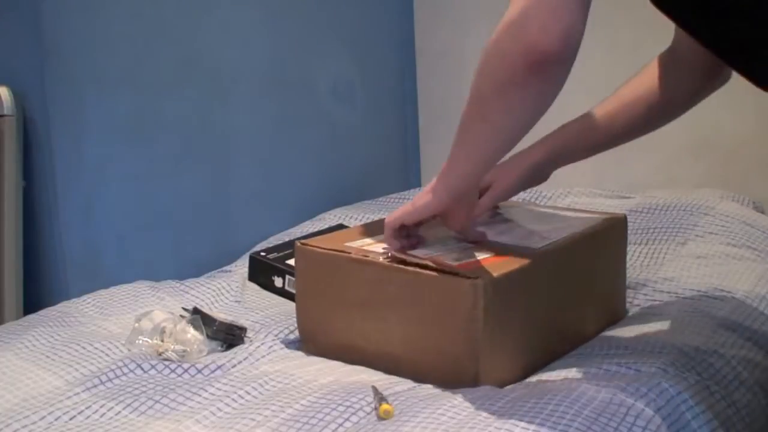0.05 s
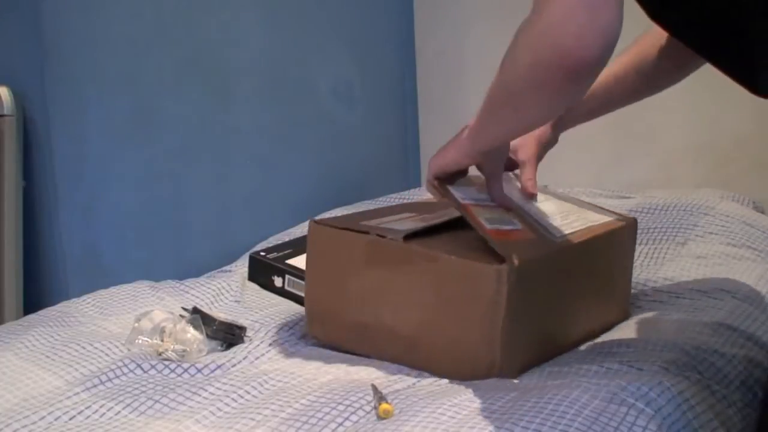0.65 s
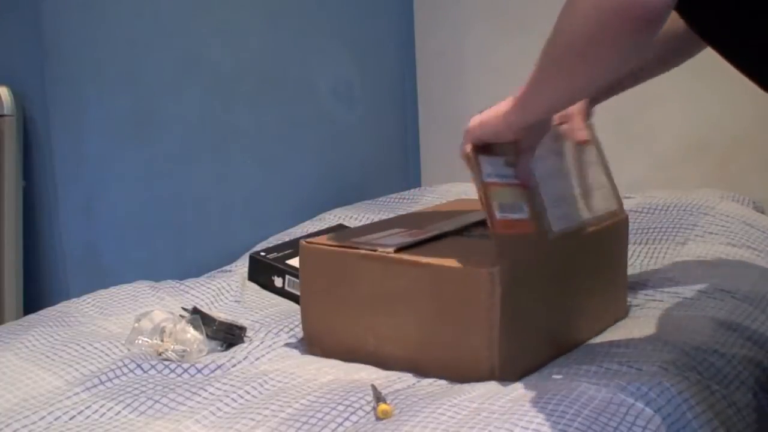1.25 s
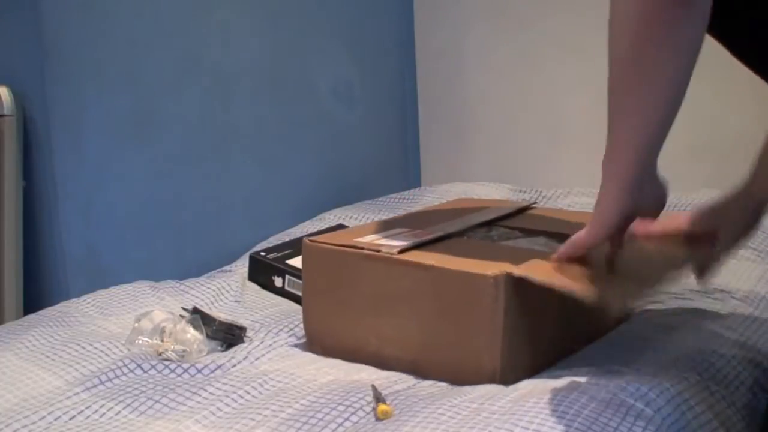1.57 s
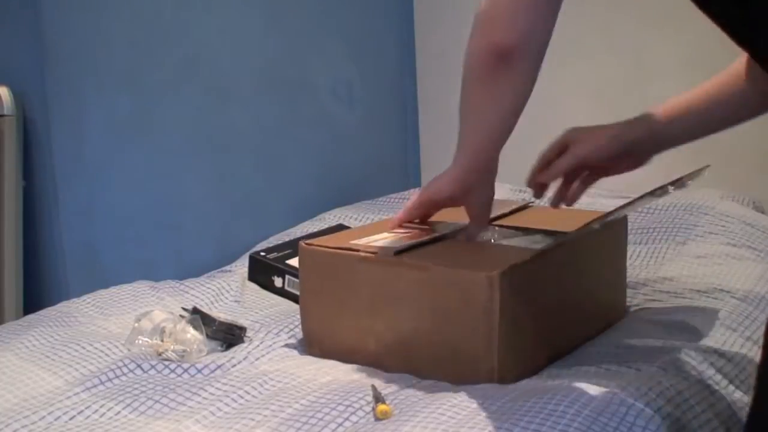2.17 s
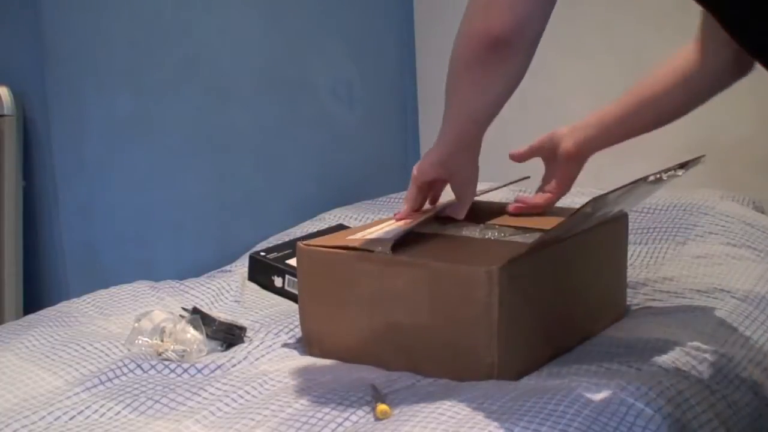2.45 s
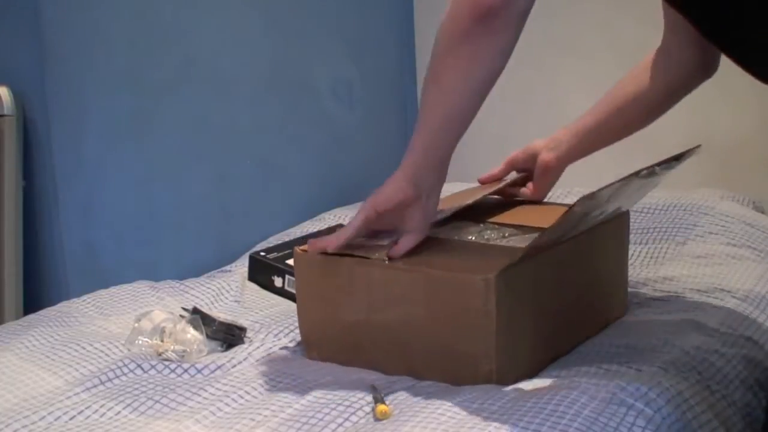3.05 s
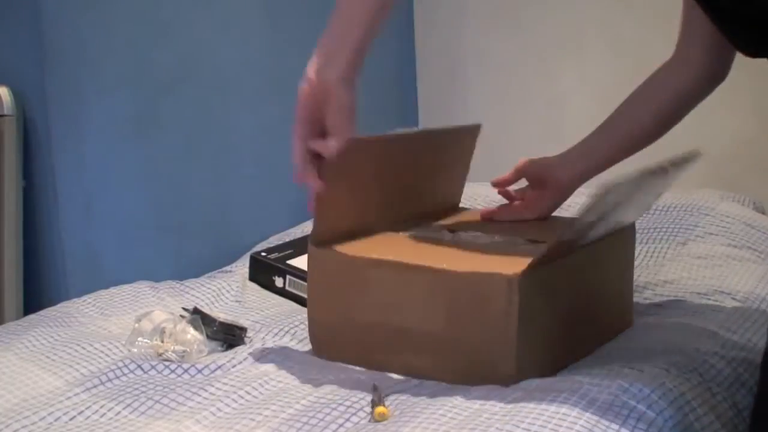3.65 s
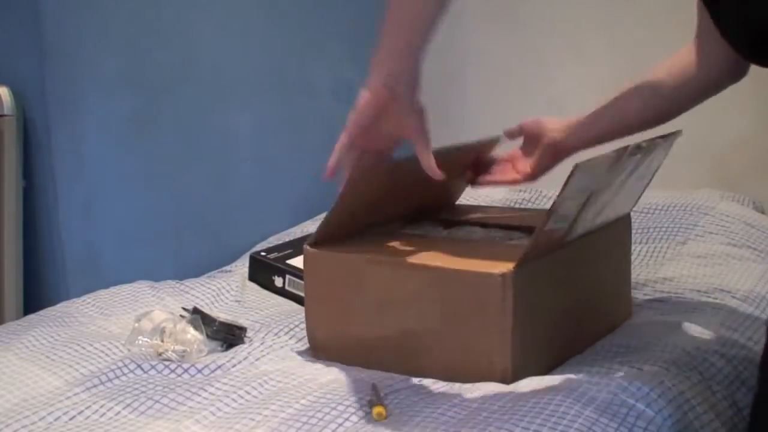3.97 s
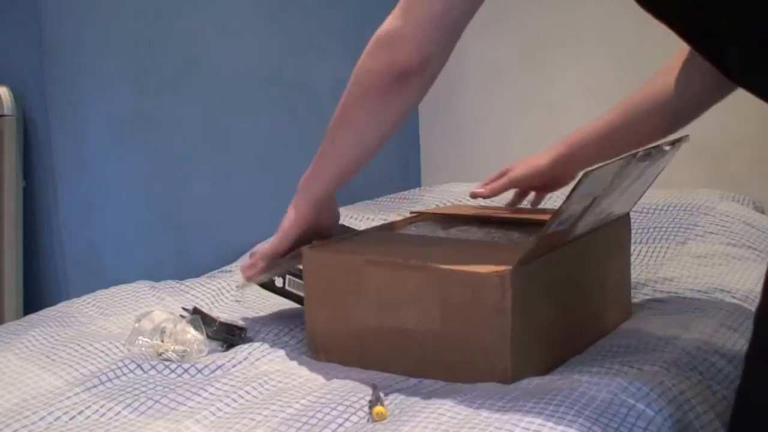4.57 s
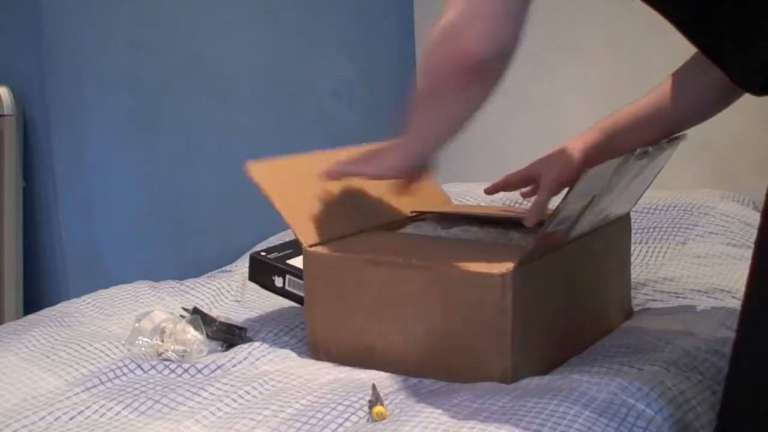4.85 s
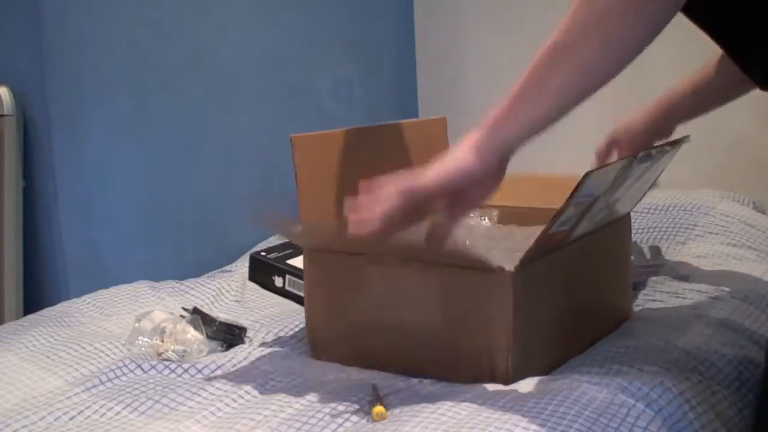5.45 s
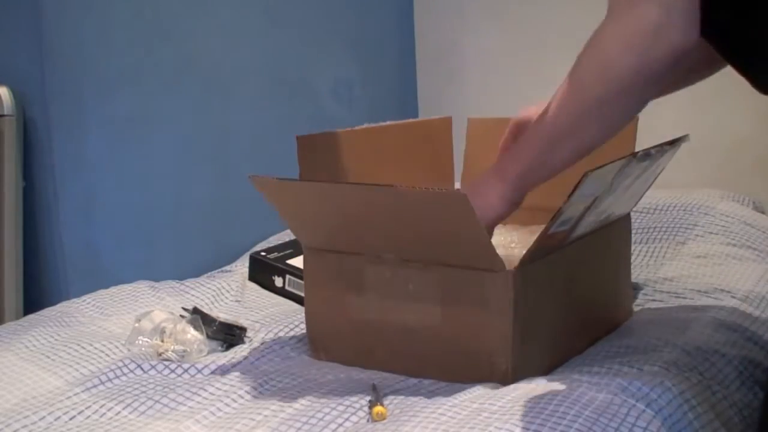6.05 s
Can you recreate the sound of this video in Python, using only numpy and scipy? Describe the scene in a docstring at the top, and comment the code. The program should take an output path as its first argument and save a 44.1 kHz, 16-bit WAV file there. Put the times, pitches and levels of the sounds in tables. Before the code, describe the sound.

Dry cardboard scraping and sharp tape snaps lead to a brief rip and a loud hollow thump as a box flap comes free. Fingers rub and tap the panels until a second rip sets off several quick knocks. The flaps then slide and creak quietly, and one last scrape grows louder. The sound is close, in a small room with short echoes and a faint hiss.

```python
"""A cardboard shipping box being opened on a bed, close to the microphone in a small bedroom.
The last of the packing tape snaps and rips, and the freed flaps thump the hollow box, ringing its panels.
Hands and flaps slide over the board as they are folded back; fingers tap and edges creak.
Near walls give short echoes, over a low room murmur and faint microphone hiss."""
import sys
import numpy as np
from scipy import signal
from scipy.fft import rfft
from scipy.io import wavfile
from scipy.ndimage import uniform_filter1d

SR = 44100
rng = np.random.default_rng(int(sys.argv[2]) if len(sys.argv) > 2 else 0)


def inscribe(sig):
    """Save sig as 16-bit PCM at rate SR to the path in sys.argv[1].

    A 1-D sig is mono; a 2-D sig holds one channel per row.
    Samples are clipped to [-1, 1] before scaling.
    """
    pcm = np.round(np.clip(np.atleast_2d(sig).T, -1, 1) * 32767)
    wavfile.write(sys.argv[1], SR, pcm.astype(np.int16))


N = 277869
TIME = np.arange(N) / SR

# room murmur and microphone hiss: (frequency [Hz], level [dB])
ROOM_TONE_SPECTRUM = [(25, -37.5), (130, -6), (175, -6), (236, -25), (317, -7), (394, -16), (840, -16.5),
                      (1330, -20), (2840, -26.5), (12900, -33), (14000, -50)]
# echoes off the near walls and ceiling: (delay [s], gain [ratio])
WALL_ECHOES = [(.0013, 0.18), (.0072, 0.097), (.0098, 0.34), (0.011, 0.2)]
# reverberation of the bedroom: (frequency [Hz], time to fall 60 dB [s])
BEDROOM_T60 = [(100, 0.35), (300, 0.28), (1000, 0.28), (4000, 0.35), (8000, 0.33), (14000, 0.39)]
# stereo width of the reverberation: (frequency [Hz], side gain [dB])
REVERB_WIDTH = [(100, -39), (400, -16.5), (1000, -8.5), (2500, -9), (5000, -13.5), (9500, -7.5),
                (12000, -8), (15000, -80)]
# colours of the finest, fine and coarser slips on board, and of tape: (frequency [Hz], level [dB])
SIZZLE_SPECTRUM = [(1000, -40), (5000, -8.5), (10500, -0.5), (12500, -5.5), (14000, -15)]
HISS_SPECTRUM = [(100, -25), (700, 1.5), (2000, 4), (5500, 4.5), (8000, 5), (11000, -5), (12800, -8),
                 (14200, -20), (16000, -62)]
RASP_SPECTRUM = [(60, -83), (200, -4.5), (400, 5), (1000, 5), (1400, -1.5), (2000, -1.5), (3000, -9),
                 (5000, -12.5), (12000, -26.5)]
TAPE_SPECTRUM = [(100, -32), (600, 4), (2000, 6), (7000, 6.5), (11500, 4.5), (13000, -0.5), (14200, -19)]
# resonances of the hollow box and its panels: (frequency [Hz], level [dB])
BOX_MODES = [(88.7, 4), (162, -4.5), (192, -1), (250, 2), (299, 3), (332, 1.5), (381, 5.5), (402, -2.5),
             (433, -3.5), (483, 3), (549, 4.5), (660, 5.5), (748, 3), (942, 1), (1025, -2), (1285, -12)]
# the small box radiates little deep bass: (frequency [Hz], gain [dB])
BOX_RADIATION = [(25, -55), (55, -2), (88, 2.5), (150, -2), (200, -0.5)]
# board edges stick and slip: (start [s], length [s], level [dB], pitch [Hz], sharpness [Q])
EDGE_CREAKS = [(1.82, 0.015, -36.5, 1840, 1.2), (2.481, 0.06, -42.5, 1930, 13),
               (2.847, 0.045, -40.5, 2230, 1.5), (4.199, 0.013, -45.5, 2090, 1.5),
               (5.514, 0.024, -48, 1150, 18), (5.568, 0.152, -42.5, 527, 2.5),
               (5.613, 0.09, -44.5, 1150, 1.4), (5.755, 0.024, -42, 620, 6.5)]
# a hand or flap slides over the board: (start [s], length [s], hiss [dB], sizzle [dB], rasp [dB],
# panel drumming [dB], swell from start to end [dB], attack [s])
SLIDING_STROKES = [(0, 0.17, -46.5, -78, -44, -43, -8, 0.00053),
                   (0.179, 0.19, -51, -47.5, -46, -38.5, -6, 0.0054),
                   (0.38, 0.22, -46.5, -56, -42, -45, -1, 0.02),
                   (0.591, 0.55, -61, -78, -50.5, -48, 3, 0.015),
                   (0.764, 0.09, -42.5, -45.5, -48.5, -66, 0, 0.061),
                   (1.185, 0.09, -43, -71, -44, -52, -19, 0.027),
                   (1.278, 0.41, -49.5, -49.5, -54, -51.5, -3.5, 0.034),
                   (1.648, 0.038, -39.5, -41.5, -47.5, -60, 6.5, 0.044),
                   (1.75, 0.34, -63, -59.5, -57.5, -57, -21, 0.024),
                   (2.099, 0.12, -36, -43.5, -39, -48, -14, 0.059),
                   (2.294, 0.33, -40.5, -43.5, -41.5, -47.5, 3, 0.048),
                   (2.632, 0.23, -49, -48.5, -53, -43, 3, 0.021),
                   (2.842, 0.071, -57, -71, -45.5, -40.5, -1, 0.016),
                   (2.916, 0.22, -56.5, -62.5, -55, -47.5, 5, 0.0098),
                   (3.177, 0.56, -47.5, -49.5, -43, -42.5, 0, 0.007),
                   (3.722, 0.24, -53.5, -56, -55, -50.5, 9.5, 0.014),
                   (4.074, 0.24, -54, -55, -59, -63, 3.5, 0.053),
                   (4.337, 0.18, -54.5, -54.5, -57, -49.5, -1.5, 0.0062),
                   (4.679, 0.16, -60, -54, -79, -79, 3.5, 0.022),
                   (5.015, .11, -42, -48.5, -46.5, -51, 0, 0.0076),
                   (5.177, 0.26, -51.5, -49, -53.5, -52, 6.5, 0.056),
                   (5.479, 0.21, -51, -48, -47.5, -51, -4.5, 0.051),
                   (5.74, 0.098, -51, -51, -48, -44, 1, 0.011),
                   (6.028, 0.34, -33, -44, -40, -50.5, 14.5, 0.0034)]
# tape and creases snap: (time [s], level [dB], centre of the colour [Hz])
TAPE_SNAPS = [(0.03, -40, 10200), (0.039, -38, 4400), (.077, -35, 3650), (0.238, -40, 5430),
              (0.2646, -37, 6300), (.272, -25.5, 5630), (0.383, -37, 9300), (.438, -30, 2900),
              (0.44, -36, 9300), (1.0225, -30.5, 1890), (1.0232, -34, 10900), (1.0258, -26, 11600),
              (1.0315, -26.5, 11600), (1.082, -39, 10200), (1.827, -41, 3300), (2.237, -40.5, 5170),
              (3.363, -45.5, 8500), (3.569, -22, 8500), (3.576, -24.5, 2980), (4.016, -45.5, 7540),
              (4.56, -36, 8800), (4.5704, -39.5, 7800), (6.037, -46.5, 7100)]
# tape tears off: (start [s], length [s], level [dB], rasp against hiss [dB], hiss tilt [dB/octave])
TAPE_RIPS = [(0.264, 0.0088, -25, 18, -18), (0.606, 0.015, -32.5, -7.5, 7), (1.032, 0.052, -37, -8, 1),
             (1.071, 0.015, -17, 5, 2.5), (1.358, 0.03, -40.5, -8, 4.5), (2.385, 0.023, -34, -12, 2),
             (3.573, 0.051, -20, -5.5, 0.5), (3.618, 0.041, -24.5, -5, -1.5)]
# fingers land on the panels: (time [s], thump [dB], panel pitch [Hz])
FINGER_TAPS = [(2.357, -28, 307), (2.434, -33.5, 340), (2.691, -31.5, 378), (2.755, -40, 310),
               (3.102, -40, 330), (3.15, -40, 383), (3.363, -37.5, 354), (3.51, -35.5, 418),
               (3.812, -43.5, 145), (4.015, -41.5, 288), (5.175, -41, 416), (5.376, -40.5, 260),
               (5.582, -46, 380)]
# flaps spring free and strike the box:
# (time [s], thump [dB], panel pitch [Hz], ring spread [octaves], slap [dB], thump left minus right [dB])
FLAP_KNOCKS = [(.077, -28, 277, 0.18, -44, 1.5), (.266, -19, 257, 0.55, -27.5, 2),
               (.4385, -14.5, 408, 0.67, -26, 5), (.457, -20.5, 194, 0.1, -50, 8.5),
               (.4585, -17, 389, 0.062, -37, 7), (1.069, -20.5, 690, 0.42, -25.5, -2),
               (1.0772, -8.5, 280, 0.25, -38, 7), (1.0855, -11.5, 321, 0.27, -32, 10),
               (1.681, -35, 430, 0.079, -43.5, 1), (1.703, -38, 490, 0.51, -35, 2),
               (2.52, -37.5, 450, 0.59, -37, 2), (3.1803, -27, 464, 0.21, -31, 2),
               (3.188, -36, 690, 0.2, -35, 1), (3.5687, -29, 950, 0.17, -18, 9),
               (3.5695, -22, 370, 0.16, -51, 5), (3.581, -16.5, 340, 0.32, -28.5, 8),
               (3.602, -25.5, 617, 0.56, -23.5, 13), (3.62, -23.5, 840, 0.22, -27, 6),
               (3.643, -21.5, 403, 0.27, -46, 9.5), (4.345, -44, 284, 0.7, -43.5, 2),
               (5.1175, -28.5, 317, 0.33, -37.5, 1.5)]


def amp(db):
    """Decibels to gain."""
    return 10 ** (np.asarray(db) / 20)


def read(points, hz):
    """A table's value at hz, on a log-frequency axis."""
    frequencies, values = np.transpose(points)
    return np.interp(np.log(hz + 1), np.log(frequencies), values)


def unit(x):
    """Scales to rms 1."""
    return x / np.sqrt(np.mean(x ** 2) + 1e-20)


def blow(x):
    """Scales a short sound to the energy of 30 ms at rms 1."""
    return x * np.sqrt(.03 * SR / (np.sum(x ** 2) + 1e-20))


def add(mix, time_s, sound):
    """Mixes a sound in at time_s."""
    part = mix[max(round(time_s * SR), 0):][:len(sound)]
    part += sound[:len(part)]


def colour(x, db_at, size=2048):
    """Minimum-phase filter whose gain in dB is the function db_at(Hz)."""
    hz = abs(np.fft.fftfreq(size, 1 / SR))
    log_gain = np.log(amp(np.maximum(db_at(hz), -100)))
    impulse = np.fft.ifft(np.exp(np.conj(signal.hilbert(log_gain)))).real
    return signal.oaconvolve(x, impulse * np.linspace(1, 0, size) ** 2)[:len(x)]


def shaped(x, points):
    """Filters a sound by the spectrum in a table."""
    return colour(x, lambda hz: read(points, hz))


def drift(knots_per_s):
    """A smooth random curve of rms near 1."""
    knots = rng.standard_normal(N // 64)
    return np.interp(TIME * knots_per_s, np.arange(len(knots)), knots)


def room_tone(level_db=-55, side_db=-9):
    """Steady low murmur of the room, with microphone hiss."""
    mid, side = (unit(shaped(rng.standard_normal(N), ROOM_TONE_SPECTRUM)) for _ in range(2))
    side *= amp(side_db)
    return amp(level_db) * np.array([mid + side, mid - side])


def room_tail(build_s=0.0027):
    """Diffuse echoes of the bedroom build up, then each band dies at its own speed."""
    hz, t, bands = signal.stft(rng.standard_normal(SR * 3 // 5), SR, nperseg=256)
    decay = amp(-60 * t / read(BEDROOM_T60, hz)[:, None])
    tail = signal.istft(bands * decay, SR, nperseg=256)[1]
    tail *= 1 - np.exp(-(np.arange(len(tail)) / SR / build_s) ** 2)
    return tail / np.linalg.norm(tail)


def reverberation(x, tails=3, turns_per_s=19):
    """The echo pattern changes as arms and flaps move: the sound feeds several tails in turn."""
    turns = turns_per_s * TIME
    shares = (np.cos(np.pi * (turns + k / tails)) * np.sqrt(2 / tails) for k in range(tails))
    return sum(signal.oaconvolve(x * share, room_tail())[:N] for share in shares)


def bedroom(x, early_db=-5.0, wet_db=-3, side_db=-1.5, sway_s=0.00019):
    """At the microphone: direct sound, wall echoes that shift as the flaps move, and the diffuse tail."""
    mono = x.mean(0)
    # the echoes and the tail carry little bass, so thumps stay close and dry
    to_walls = shaped(mono, [(350, -12), (1000, 0)])
    to_tail = shaped(mono, [(300, -7), (1200, 0)])
    walls = sum(gain * np.interp(TIME - delay - sway_s * drift(12), TIME, to_walls, left=0)
                for delay, gain in WALL_ECHOES)
    mid = amp(wet_db) * reverberation(to_tail)
    side = amp(side_db) * shaped(reverberation(mono), REVERB_WIDTH)
    return amp(early_db) * (x + walls) + np.array([mid + side, mid - side])


def fibre_slips(per_s, spread_db):
    """Tiny slips of fibres: random clicks, a few much larger than the rest."""
    strength = amp(spread_db * np.minimum(rng.exponential(1, N), 4))
    return unit(strength * rng.choice([-1, 1], N) * (rng.random(N) < per_s / SR))


def crack(decay_s, crumble=1.77, size=2048):
    """One sharp break and a brief, uneven crumble of fibres, evened out so that it has no pitch."""
    fibres = rng.laplace(size=size) * np.exp(-np.arange(size) / SR / decay_s)
    burst = signal.unit_impulse(size) + crumble * fibres / np.linalg.norm(fibres)
    power = unit(uniform_filter1d(abs(rfft(burst)) ** 2, size=3)) + .05
    bins_hz = np.fft.rfftfreq(size, 1 / SR)
    return colour(burst, lambda hz: -10 * np.log10(np.interp(hz, bins_hz, power)))


def panel_ring(panel_hz, octaves, damping, contact_s=0.0024):
    """The ring of one panel: the box modes nearest to its pitch sound most."""
    t = np.arange(SR // 4) / SR
    hz, db = np.transpose(BOX_MODES)[:, :, None]
    t60 = 0.1 / damping * (400 / hz) ** 0.78  # higher modes die sooner
    share = 1 / (1 + (np.log2(hz / panel_hz) / octaves) ** 2)
    modes = share * amp(db - 60 * t / t60) * np.sin(2 * np.pi * hz * t)
    onset = 1 - np.exp(-t / contact_s)  # soft board takes a moment to take up the blow
    return shaped(modes.sum(0) * onset, BOX_RADIATION)


def edge_creaks(wander_octaves=0.022):
    """Quick slips ring a resonance of the board's edge, which wanders as the contact moves."""
    out = np.zeros(N)
    slips = fibre_slips(per_s=1400, spread_db=1.3)
    wander = 2 ** (wander_octaves * drift(60))
    for start, length, db, hz, sharpness in EDGE_CREAKS:
        during = (TIME >= start) & (TIME < start + length)
        # shift down, low-pass, shift back: a band that follows the pitch
        carrier = np.exp(2j * np.pi * np.cumsum(hz * wander[during]) / SR)
        lowpass = signal.butter(2, hz / sharpness / 2, fs=SR)
        ring = (carrier * signal.lfilter(*lowpass, slips[during] / carrier)).real
        add(out, start, amp(db) * unit(ring * signal.windows.tukey(len(ring), .4)))
    return out


def stroke_pressure(start, length, swell_db, attack_s, lift_db_per_s=256):
    """Gain of one stroke: it takes hold, swells or eases while it lasts, and dies as the hand lifts."""
    t = TIME - start
    hold = np.clip(t / attack_s, 0, 1)
    progress = np.clip(t / length, 0, 1)
    lifted_s = np.clip(t - length, 0, 1)
    return hold * amp(swell_db * (progress - .5) - lift_db_per_s * lifted_s)


def rubbing():
    """Sliding on board: the finest slips sizzle, fine ones hiss, coarser ones rasp, the coarsest drum."""
    power = sum((amp(levels_db)[:, None] * stroke_pressure(start, length, swell_db, attack_s)) ** 2
                for start, length, *levels_db, swell_db, attack_s in SLIDING_STROKES)
    hiss_gain, sizzle_gain, rasp_gain, drum_gain = np.sqrt(power)
    grip = amp(2.75 * drift(110))  # the contact catches and lets go
    hiss = hiss_gain * unit(shaped(fibre_slips(per_s=7000, spread_db=4.5), HISS_SPECTRUM))
    sizzle = sizzle_gain * unit(shaped(fibre_slips(per_s=2500, spread_db=5.2), SIZZLE_SPECTRUM))
    rasp = rasp_gain * unit(shaped(fibre_slips(per_s=2500, spread_db=3.0), RASP_SPECTRUM))
    held_panel = panel_ring(panel_hz=340, octaves=0.68, damping=2)  # the resting hand damps it
    drum = drum_gain * unit(signal.oaconvolve(fibre_slips(per_s=130, spread_db=2.66), held_panel)[:N])
    return grip * (hiss + sizzle + rasp) + drum


def tape_snaps(width_hz=1600):
    """Taut tape and creases give way in short cracks, each with a broad hump of colour."""
    out = np.zeros(N)
    for time_s, db, centre_hz in TAPE_SNAPS:
        hump = lambda hz: read(TAPE_SPECTRUM, hz) - 10 * np.log10(1 + ((hz - centre_hz) / width_hz) ** 2)
        add(out, time_s, amp(db) * blow(colour(crack(decay_s=0.0017), hump)))
    return out


def tape_rips():
    """The glue lets go in a dense run of slips that shake both tape and board."""
    out = np.zeros(N)
    slips = fibre_slips(per_s=4000, spread_db=5.1)
    rasp = shaped(slips, RASP_SPECTRUM)
    for start, length, db, rasp_db, tilt_db in TAPE_RIPS:
        hiss = colour(slips, lambda hz: read(HISS_SPECTRUM, hz) + tilt_db * np.log2(hz / 4000 + 0.13))
        during = (TIME >= start) & (TIME < start + length)
        tear = unit(hiss[during]) + amp(rasp_db) * unit(rasp[during])
        add(out, start, amp(db) * unit(tear * signal.windows.tukey(len(tear), .25)))
    return out


def box_knocks(crush_db=-12.5, tap_octaves=0.21, tap_slap_db=-48, tap_pan_db=1.5):
    """Each flap or fingertip slaps the board and rings the struck panel of the hollow box."""
    out = np.zeros((2, N))
    # soft fingertips all slap equally lightly
    taps = [(*tap, tap_octaves, tap_slap_db, tap_pan_db) for tap in FINGER_TAPS]
    for time_s, thump_db, panel_hz, octaves, slap_db, pan_db in [*FLAP_KNOCKS, *taps]:
        damping = 1 + amp(thump_db - crush_db)  # hard blows crush the board and ring shorter
        thump = amp(thump_db) * blow(panel_ring(panel_hz, octaves, damping))
        contact = crack(decay_s=0.0082, crumble=18.0, size=len(thump))
        slap = amp(slap_db) * blow(shaped(contact, RASP_SPECTRUM))
        add(out[0], time_s, thump * amp(pan_db / 2) + slap)
        add(out[1], time_s, thump / amp(pan_db / 2) + slap)
    return out


def scene(left_db=1.0):
    """The box close up in the bedroom, with rubbing, creaks and tape slightly left of the microphone."""
    surface = rubbing() + edge_creaks() + tape_snaps() + tape_rips()
    pan = amp([[left_db / 2], [-left_db / 2]])
    return bedroom(box_knocks() + surface * pan) + room_tone()


def record(dry, cutoff_hz=16100):
    """The recorder clips any peak over full scale, then cuts the highest treble."""
    lowpass = signal.firwin(511, cutoff_hz, window=("kaiser", 9), fs=SR)
    return signal.oaconvolve(np.clip(dry, -1, 1), lowpass[None], "same")


dry = scene()
out = record(dry)
inscribe(out)
```